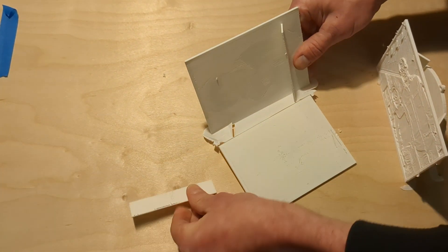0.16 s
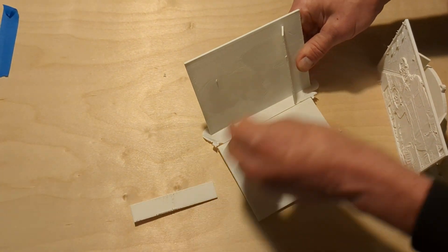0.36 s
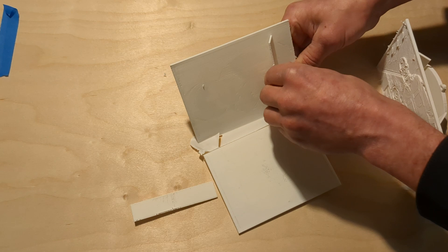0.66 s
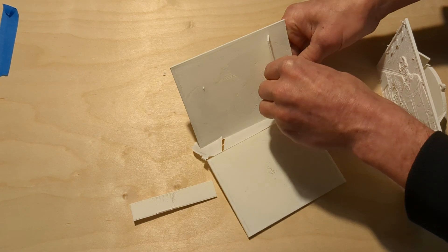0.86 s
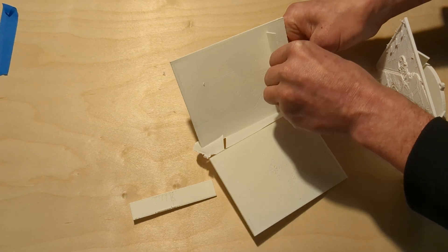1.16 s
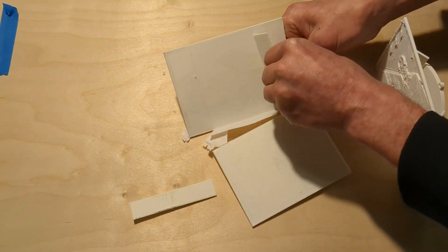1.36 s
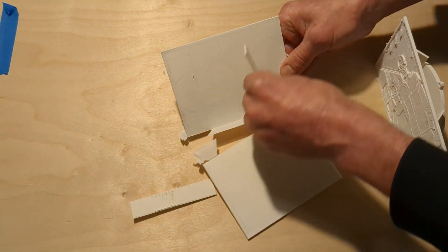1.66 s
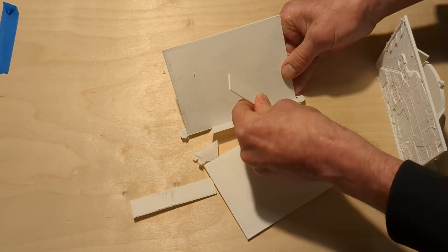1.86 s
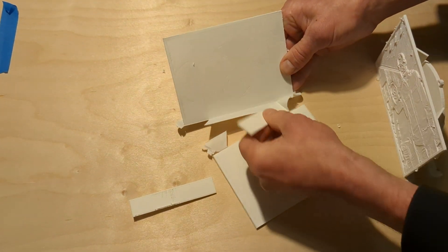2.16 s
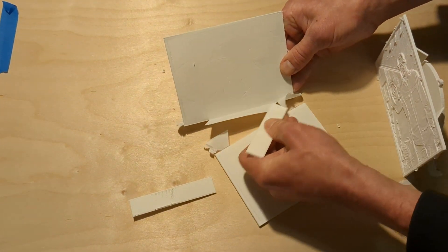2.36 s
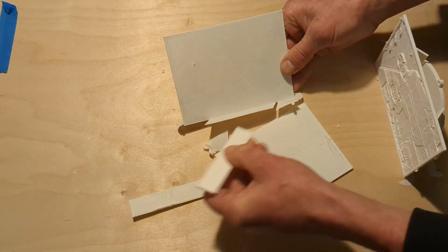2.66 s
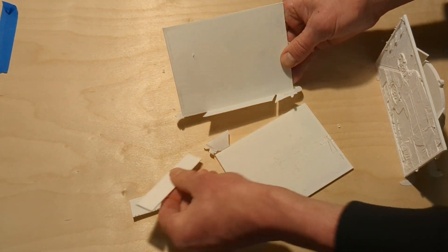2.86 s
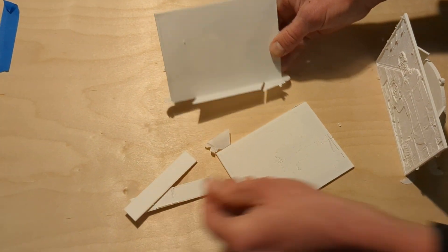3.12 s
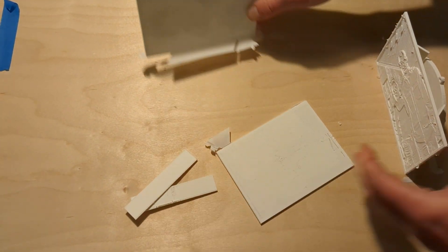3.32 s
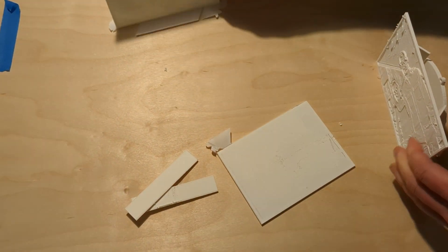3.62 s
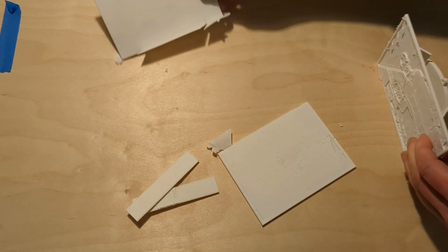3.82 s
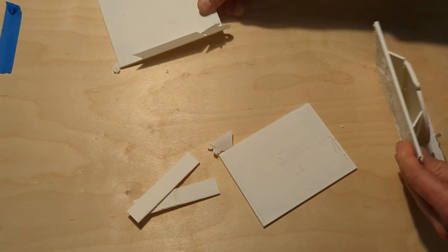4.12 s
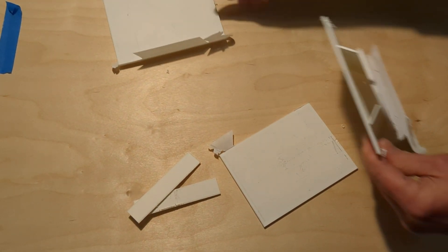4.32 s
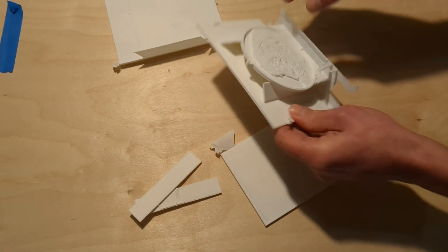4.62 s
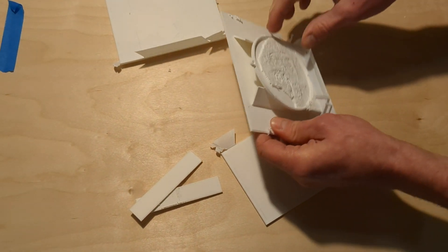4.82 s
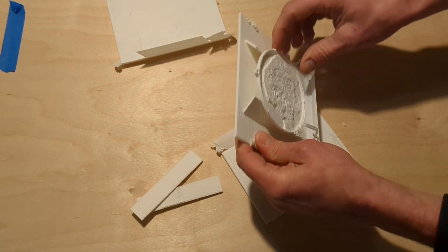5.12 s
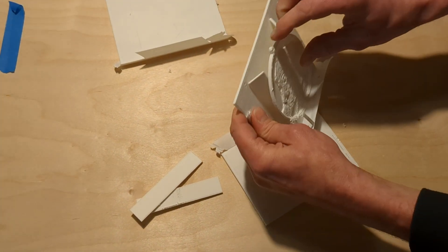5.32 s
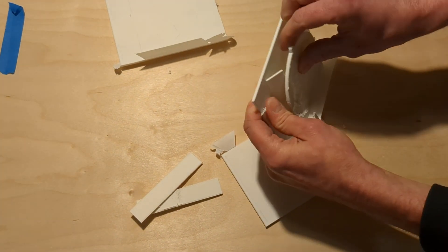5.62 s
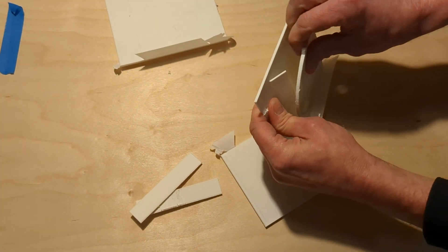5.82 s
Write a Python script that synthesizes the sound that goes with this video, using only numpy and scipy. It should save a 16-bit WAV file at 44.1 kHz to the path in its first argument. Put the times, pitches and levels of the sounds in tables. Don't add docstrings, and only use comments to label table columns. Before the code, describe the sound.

Close handling of rigid plastic parts in a small room: light ticks, one loud snap and clatter, a small drop, clacks and ridged rubbing.

```python
import sys
import numpy as np
from scipy import signal
from scipy.fft import rfft, irfft, next_fast_len
from scipy.io import wavfile
from scipy.ndimage import uniform_filter1d

SR = 44100
rng = np.random.default_rng(int(sys.argv[2]) if len(sys.argv) > 2 else 0)


def persist_wave(psi):
    counts = np.round(np.clip(psi, -1, 1) * 32767).astype(np.int16)
    wavfile.write(sys.argv[1], SR, np.atleast_2d(counts).T)


def ratio_of_db(decibels):
    return 10 ** (np.asarray(decibels, float) / 20)


N = 263718

RIGHT_LAG = 3
PART_STARTS = [
    0,
    1.9,
    3.4,
    4.2,
]
# (frequency [Hz], level [dB per Hz])
RUB_HISS = [(1470, -34), (2500, -2), (3370, -3), (7980, -16.5), (11400, -11.5), (13900, -15.5),
            (15100, -18), (16100, -21), (16500, -47.5)]


def evened(x):
    return x / np.sqrt(np.mean(x ** 2) + 1e-20)


def peak(x):
    return np.sqrt(uniform_filter1d(x ** 2, 130).max())


def read(points, hz):
    f, value = np.transpose(points)
    return np.interp(np.log(hz + 1), np.log(f + 1), value)


def add(mix, s, sound):
    part = mix[:, round(s * SR):][:, :sound.shape[1]]
    part += sound[:, :part.shape[1]]


def coloured(x, points):
    size = next_fast_len(x.shape[-1])
    gain = ratio_of_db(read(points, np.fft.rfftfreq(size, 1 / SR)))
    return irfft(rfft(x, size) * gain, size)[..., :x.shape[-1]]


def spread_noise(x):
    # (frequency [Hz], correlation [0-1])
    likeness = [(60, .97), (300, .96), (600, .45), (1400, .3), (3100, .2), (7000, 0)]
    a, b = rfft(x)
    same = np.clip(read(likeness, np.fft.rfftfreq(N, 1 / SR)), 0, 1)
    right = same * a + np.sqrt(1 - same ** 2) * b
    return irfft(np.array([a, right]), N)


def grit(shape, spread_db):
    size = np.minimum(rng.exponential(1, shape), 5)
    return rng.standard_normal(shape) * ratio_of_db(spread_db * size)


def clumping(length, window, depth_db):
    return ratio_of_db(depth_db * evened(uniform_filter1d(rng.standard_normal(length), window)))


def air():
    # (frequency [Hz], level [dB per Hz])
    noise_colour = [(20, -30), (45, -2), (125, 1), (300, -10), (600, -13), (780, -5), (1000, -9),
                    (2100, -6), (3500, -13), (6000, -18), (11500, -16), (13000, -21), (16500, -32)]
    noise = coloured(rng.standard_normal((2, N)), noise_colour)
    return ratio_of_db(-62 - 9.5) * evened(spread_noise(noise))


def room(x):
    # (frequency [Hz], level [dB])
    wall_colour = [(150, -12.5), (700, -2.5), (2000, -10), (5000, -8), (12000, -9.5)]
    # (frequency [Hz], t60 [s])
    decay = [(150, 0.07), (700, 0.47), (1800, 0.53), (4000, 0.4), (8000, 0.35), (14000, 0.27)]
    taps = np.zeros((2, SR))
    at = np.arange(200, SR - 20, 20) + rng.integers(0, 20, (2, (SR - 201) // 20))
    np.put_along_axis(taps, at, rng.choice([-1., 1.], at.shape), 1)
    hz, t, z = signal.stft(taps, SR, nperseg=256)
    fade = ratio_of_db(-60 * t / read(decay, hz)[:, None])
    tail = signal.istft(z * fade, SR, nperseg=256)[1]
    tail = tail / np.linalg.norm(tail[0])
    echo = signal.fftconvolve(coloured(x, wall_colour), tail, axes=1)[:, :N]
    return spread_noise(echo)


def squeal(s, length, db, top_db):
    line_hz = [
        7560,
        8600,
        13330,
    ]
    t = np.arange(round(length * SR)) / SR
    wander = uniform_filter1d(rng.standard_normal((2, 3, 16000)), 250)[..., :len(t)]
    sines = np.sin(2 * np.pi * np.array(line_hz)[:, None] * t)
    lines = evened(wander) * sines * ratio_of_db(np.array([[0], [0], [top_db]]))
    return ratio_of_db(db + 2.5) * lines.sum(1) * np.hanning(len(t)) ** .5


def add_squeals(far):
    # (time [s], length [s], level [dB], weight of the top line [dB])
    bursts = [
        (0.098, .33, -68.5, 0),
        (1.11, 0.072, -80.5, -12),
        (1.696, 0.15, -80, -18),
        (2.693, 0.12, -73, -8.5),
        (5.179, 0.18, -82.5, -12),
    ]
    for row in bursts:
        add(far, row[0], squeal(*row))


def pushes():
    # (time [s], knock level [dB], rumble level [dB], t60 [s])
    push_list = [(0.018, -46, -52.5, 0.73), (0.17, -76, -59, 0.56), (0.4, -74, -63.5, 0.64),
                 (0.851, -57, -68, 0.19), (1.285, -41, -64, 0.5), (1.5, -64.5, -62, 0.44),
                 (2.14, -53, -59.5, 1), (2.3, -74, -59, 0.64), (2.45, -67, -63, 1),
                 (2.6, -66.5, -59.5, 0.69), (3.03, -71, -69, 0.43), (3.45, -72, -72, 0.21),
                 (3.64, -57, -73, 0.36), (4.291, -49.5, -60, 0.35), (5.41, -73.5, -78, .4),
                 (5.66, -59, -66, 0.27), (5.8, -65.5, -70, 0.62), (2.92, -67, -78, 0.17)]
    rise_s = 0.014
    rest_db = np.array([[-77.5], [-79.5]])
    power = ratio_of_db(rest_db) ** 2 * np.ones(N)
    for s, knock_db, rumble_db, t60 in push_list:
        t = np.maximum(np.arange(N) / SR - s + rise_s, 0)
        fall = ratio_of_db(np.array([[knock_db], [rumble_db]]) - 60 * t / t60)
        power = power + (fall * np.minimum(t / rise_s, 1)) ** 2
    return np.sqrt(power)


def table():
    knock_colour = [(70, -13.5), (125, 12.5), (300, -3), (550, -9.5), (900, -38.5)]
    rumble_colour = [(20, -25.5), (48, 11), (80, 7), (130, -51.5)]
    knock = coloured(rng.standard_normal((2, N)), knock_colour)
    rumble = coloured(rng.standard_normal((2, N)), rumble_colour)
    knock_gain, rumble_gain = pushes()
    return spread_noise(knock_gain * evened(knock) + rumble_gain * evened(rumble))


def grip_level(column):
    # (time [s], rubbing level [dB], share of bare skin sliding [dB])
    grip = [(0.0, -53.5, -41), (0.2, -65, 10.5), (0.45, -46, -15.5), (0.75, -58.5, -5.5), (1.15, -68, -3),
            (1.45, -39.5, -14), (1.75, -69, -12.5), (2.1, -42, -15), (2.3, -71, 4), (2.42, -38, -15),
            (2.7, -54.5, -5), (2.9, -80, -4), (3.57, -87, -2), (3.8, -49.5, -17), (4.2, -67, 9.5),
            (4.902, -55.5, -32), (5.35, -58, -20), (5.7, -57.5, -27)]
    return np.interp(np.arange(N) / SR, *np.transpose(grip)[[0, column]])


def skin():
    flicker = clumping(N, 200, 2.5)
    hiss = coloured(grit((2, N), 0.95) * flicker, RUB_HISS)
    return ratio_of_db(grip_level(1) + grip_level(2) - 7.0) * evened(hiss)


def part_number(s):
    return np.searchsorted(PART_STARTS, s, "right") - 1


def part_at(s):
    # (frequency [Hz], level [dB], t60 [s])
    plate = [(980, -25.5, 0.017), (1250, -13, .025), (1330, -14, 0.06), (1576, -6.5, 0.018),
             (1830, -2.5, 0.014), (2066, 10.5, 0.0057), (2490, -0.5, 0.018), (2560, -5.5, 0.0076),
             (3090, -1.5, 0.026), (3700, 4, 0.028), (4320, 4, .008)]
    bar = [(922, -3, 0.03), (1118, -1, 0.023), (1417, -3, 0.0059), (2016, -14, 0.0097), (2130, -2.5, .015),
           (2422, -2.5, .018), (2810, -8.5, 0.022), (3140, -2.5, 0.015), (3834, -4.5, 0.0084),
           (4596, -4.5, 0.024)]
    panel = [(320, 2, 0.015), (484, -13, 0.019), (604, -34, 0.013), (840, 0, 0.077), (948, -8, 0.0198),
             (1135, -3, 0.058), (1427, -1.5, 0.022), (1956, -8.5, .012), (2373, -1.5, 0.018),
             (3360, -16, 0.008), (3930, -15, .01)]
    frame = [(900, -11, 0.015), (1135, -10, 0.044), (1354, -6.5, 0.053), (1770, -0.5, 0.021),
             (2095, 0.5, 0.0083), (2460, 3, 0.012), (2748, -3, 0.017), (3180, -1.5, 0.0097),
             (4250, -4, 0.022)]
    return (plate, bar, panel, frame)[part_number(s)]


def ring(modes, centre_hz, octaves, chance):
    hz, db, t60 = np.transpose(modes)[:, :, None]
    t = np.arange(2000) / SR
    db = db - 6 * (np.log2(hz / centre_hz) / octaves) ** 2 + 1.5 * chance[:len(hz), :1]
    hz = hz * (1 + .015 * chance[:len(hz), 1:])
    rings = ratio_of_db(db - 60 * t / np.clip(t60, .004, .03)) * np.sin(2 * np.pi * hz * t)
    bass_cut = signal.butter(6, .86 * modes[0][0], "high", fs=SR, output="sos")
    return signal.sosfilt(bass_cut, rings.sum(0))


def scraping():
    clumps = clumping(N, 300, 3.0)
    slips, out = grit((2, N), 0.84) * clumps, np.zeros((2, N))
    t = np.arange(N)
    for start, end in zip(PART_STARTS, PART_STARTS[1:] + [N / SR]):
        held = (t >= start * SR) & (t < end * SR)
        body = ring(part_at(start), 1800, 1.5, np.zeros((12, 2)))
        body = body / np.linalg.norm(body)
        out += signal.oaconvolve(slips * held, body[None], axes=1)[:, :N]
    return ratio_of_db(grip_level(1) - 13.0) * evened(spread_noise(out))


def excite(s, contacts, hz, octaves, treble_db, colour):
    # (frequency [Hz], level [dB])
    thud_colour = [(120, -30), (250, -4.5), (450, 0), (750, -26.5)]
    modes = ring(part_at(s), hz, octaves, rng.standard_normal((12, 2)))
    body = signal.fftconvolve(contacts[0], modes)[:contacts.shape[1]]
    thud = coloured(np.roll(contacts[0], 60), thud_colour)
    body = body / peak(body) + ratio_of_db(-26.5) * thud / peak(thud)
    leaked = contacts + 0.15 * contacts[::-1]
    direct = coloured(np.roll(leaked, 40, axis=1), colour)[:, 40:]
    treble = coloured(direct[0], [(4000, -40), (5000, 0)])
    sides = np.array([body, np.roll(body, RIGHT_LAG)])[:, :-40]
    return sides + ratio_of_db(treble_db) * direct / peak(treble)


def stroke(s, length, db, hz, hiss_db):
    t = np.arange(8000) / SR
    swell = np.sin(np.pi * np.clip(t / length, 0, 1) ** 0.76) ** 0.78
    slips = grit((2, len(t)), 1.1) * clumping(len(t), 120, 3.4) * swell
    return excite(s, slips, hz, 0.29, hiss_db, RUB_HISS) * ratio_of_db(db + 4.5)


def add_feels(near):
    # (time [s], length [s], level [dB], centre [Hz], hiss against body [dB])
    feels = [(4.724, 0.017, -42, 2400, -19.5), (4.765, 0.05, -39, 2800, -7.5),
             (4.905, 0.11, -57, 2110, -11), (5.085, 0.065, -58, 2200, -27), (5.121, 0.018, -65, 2570, -2),
             (5.183, 0.032, -63.5, 1980, -6), (5.263, 0.02, -51.5, 2670, -7),
             (5.409, 0.028, -59, 2990, -28.5), (5.506, 0.072, -60, 1980, -15),
             (5.636, 0.044, -61.5, 1300, -3.5), (5.698, 0.015, -57, 2900, -18),
             (5.964, 0.0097, -78.5, 2550, 2), (5.972, 0.022, -51.5, 2280, -13.5)]
    for row in feels:
        add(near, row[0], stroke(*row))


def add_strokes(near):
    # (time [s], length [s], level [dB], hiss against body [dB])
    strokes = [(.44, 0.13, -58, -13), (0.693, 0.055, -55.5, -13), (0.803, 0.084, -51.5, -19),
               (0.936, 0.031, -60.5, -19), (1.151, 0.024, -61, -29), (1.259, 0.019, -24, -30),
               (1.281, 0.026, -25, -11.5), (1.527, 0.037, -46.5, -41), (1.595, 0.098, -50, -19.5),
               (1.683, 0.033, -51, -24), (1.973, 0.12, -57, -10.5), (2.028, 0.074, -52, -13.5),
               (2.277, 0.024, -44.5, -38), (2.379, 0.034, -49, -1.5), (2.45, 0.017, -43, 3.5),
               (2.911, 0.079, -59, -17.5), (3.403, 0.09, -67.5, -35), (3.611, 0.11, -56, -13.5),
               (3.733, 0.12, -59, -2), (3.85, 0.084, -52, -13), (4.005, 0.071, -62, -3.5),
               (4.103, 0.037, -63.5, -6.5), (2.598, 0.15, -71.5, -24), (2.207, 0.044, -53, -23)]
    patch_hz = [
        1880,
        2000,
        1873,
    ]
    for s, length, db, hiss_db in strokes:
        add(near, s, stroke(s, length, db, patch_hz[part_number(s)], hiss_db))


def hit(s, db, hz, crack_db, t60, pan_db):
    # (frequency [Hz], level [dB per Hz])
    crack_colour = [(410, -48), (700, -34), (2150, -9), (2520, -7), (3650, -12.5), (4460, -2), (5430, -11),
                    (7970, -7.5), (10300, -8.5), (13200, -6.5), (15200, -34.5), (16500, -38.5)]
    t = np.arange(5000) / SR
    rattle = evened(grit((2, len(t)), 4.4)) * ratio_of_db(-60 * t / np.clip(t60, .004, .2))
    rattle[0, 0] = rattle[1, RIGHT_LAG] = 4.95
    pan = np.array([[.5], [-.5]]) * np.clip(pan_db, -9, 9)
    return excite(s, rattle, hz, 0.55, crack_db, crack_colour) * ratio_of_db(db + pan)


def add_taps(near):
    # (time [s], peak level [dB], centre of the struck patch [Hz], crack against body [dB])
    taps = [(0.142, -41.5, 1120, -12), (0.244, -38, 1190, -27), (0.289, -39.5, 1900, -9),
            (0.334, -45.5, 1070, -11), (0.463, -54.5, 1810, -9), (0.625, -48.5, 1380, -8.5),
            (0.814, -48, 1590, -26.5), (0.928, -57, 1840, -4), (0.982, -55.5, 1854, -9),
            (1.001, -38.5, 1820, -13.5), (1.017, -48, 1950, -13.5), (1.042, -56.5, 1520, -5.5),
            (1.207, -40.5, 1830, -28.5), (1.534, -42.5, 2100, -28), (1.56, -50.5, 2140, -2),
            (1.637, -62, 2010, -50), (1.694, -63, 2010, -21), (1.773, -49, 2380, -15),
            (1.969, -53, 2080, -16), (5.401, -54, 3080, -37), (5.444, -49, 1320, -31),
            (5.556, -52.5, 1760, -3.5), (5.695, -43.5, 2500, -27), (5.798, -37, 2850, -17)]
    for row in taps:
        add(near, row[0], hit(*row, t60=0.037, pan_db=-0.3))


def add_knocks(near):
    # (time [s], peak level [dB], centre [Hz], crack against body [dB], rattle t60 [s])
    knocks = [(2.189, -23, 2300, -11, 0.03), (2.193, -23.5, 2820, -8, 0.03),
              (2.324, -25.5, 2100, -27, 0.018), (2.377, -34, 1945, -10, 0.038),
              (2.452, -36.5, 1950, -2, 0.05), (2.548, -28.5, 2220, -0.5, 0.026),
              (2.92, -49.5, 892, -8.5, 0.039), (3.634, -30, 754, -32, 0.012), (3.781, -56, 807, 0, 0.036),
              (3.844, -49.5, 2330, -12, 0.077), (4.259, -28.5, 2430, -15.5, 0.0083),
              (4.296, -16, 2490, -23, 0.011), (4.305, -32, 2460, -11, 0.0043),
              (4.314, -45.5, 2430, -1, 0.025), (4.338, -32.5, 1960, -19, 0.013),
              (4.732, -35.5, 2480, -10.5, 0.012), (4.777, -31, 2770, -5, 0.054),
              (3.636, -43.5, 405, -44, 0.076), (4.787, -39, 2940, -7, 0.015),
              (0.235, -59.5, 1900, 10.5, 0.022), (4.812, -39, 2500, 1, 0.025),
              (5.272, -47.5, 1135, -29, 0.049), (4.042, -53.5, 2400, -1, 0.033)]
    for row in knocks:
        add(near, row[0], hit(*row, pan_db=-1))


def add_snaps(near):
    # (time [s], peak level [dB], crack against body [dB], rattle t60 [s], left-right [dB])
    snaps = [(1.256, -44.5, -29, 0.0076, -2.5), (1.263, -28.5, -15, 0.019, 1.5),
             (1.266, -21.5, -21.5, 0.0044, -0.5), (1.2696, -23, 1.5, 0.088, 5.5),
             (1.274, -17.5, -9.5, 0.072, -0.1), (1.291, -27.5, -13, 0.034, -1.5),
             (1.311, -20.5, -8.5, 0.012, 3), (1.32, -19, -16, 0.057, -4), (1.378, -27, -24, 0.061, -7),
             (1.383, -23, -30, 0.012, 4.5), (3.006, -38, 5, 0.022, 2), (3.016, -37.5, 12, 0.031, 4),
             (3.021, -33, -18, 0.039, -6)]
    for s, db, *rest in snaps:
        add(near, s, hit(s, db, 2150, *rest))


def scene():
    far = air() + table()
    add_squeals(far)
    near = skin() + scraping()
    add_feels(near)
    add_strokes(near)
    add_taps(near)
    add_knocks(near)
    add_snaps(near)
    return near + room(near) + far


def top_cut(x):
    return signal.sosfilt(signal.butter(12, 16820, fs=SR, output="sos"), x)


def record(dry):
    top_hz, edge_hz = 13300, 16100
    hz, t, z = signal.stft(dry, SR, nperseg=1024)
    top = hz > top_hz
    top_db = 10 * np.log10((abs(z[:, top]) ** 2).sum((0, 1)) + 1e-20)
    z[:, top] *= np.clip((top_db + 82) / 3, .02, 1)
    z[:, hz > edge_hz] *= .01
    mix = signal.istft(z, SR, nperseg=1024)[1][:, :N]
    return top_cut(mix)


dry = scene()
out = record(dry)
persist_wave(out)
```